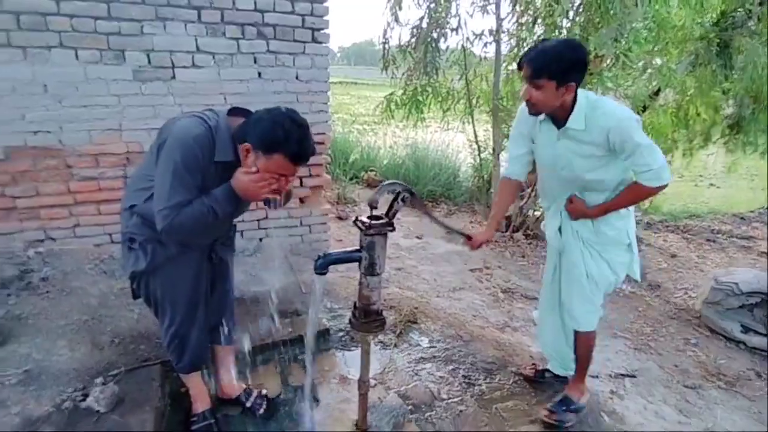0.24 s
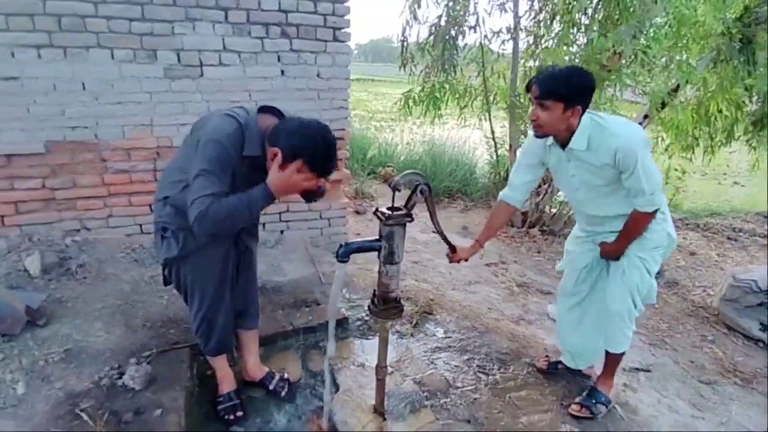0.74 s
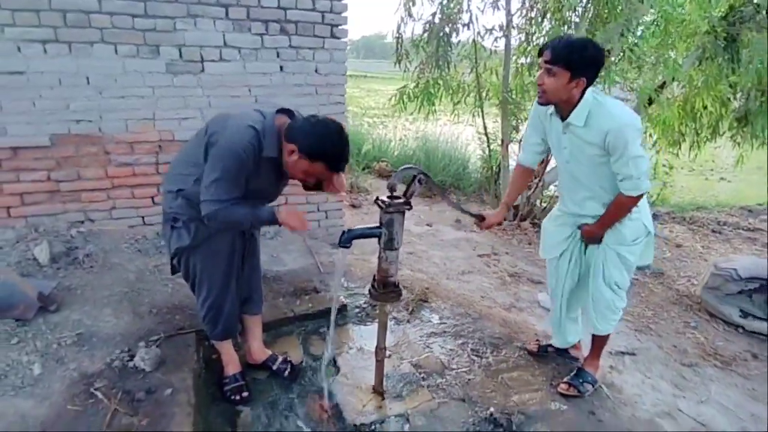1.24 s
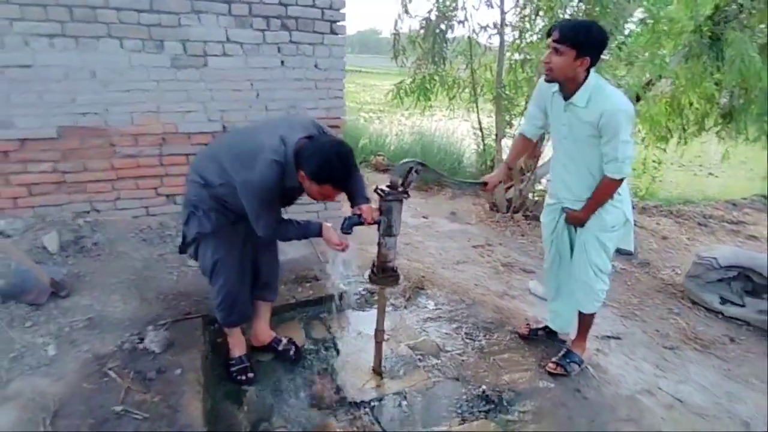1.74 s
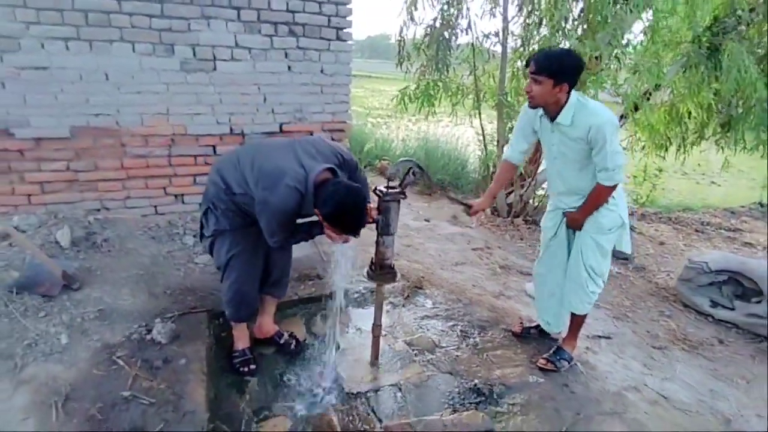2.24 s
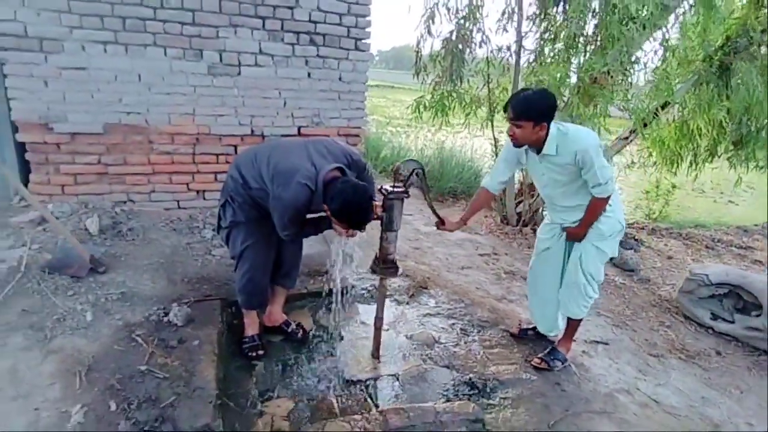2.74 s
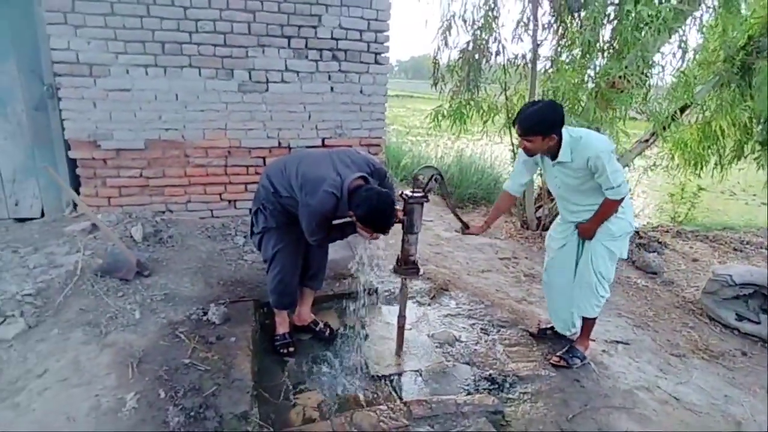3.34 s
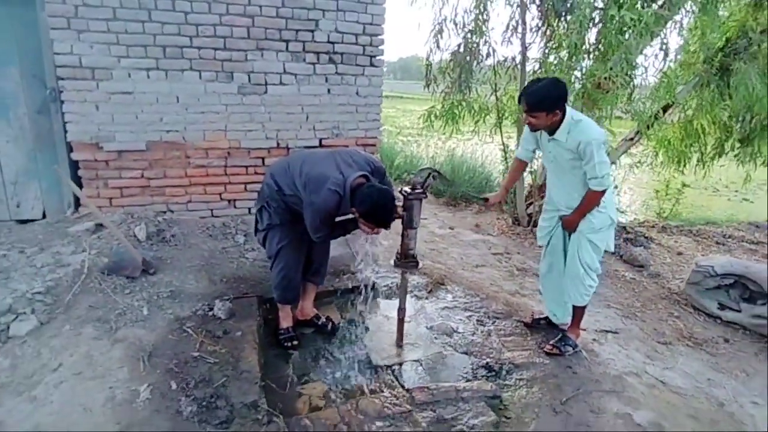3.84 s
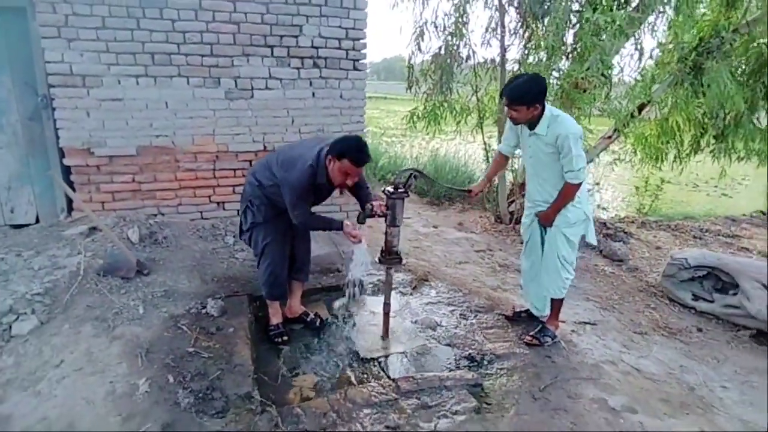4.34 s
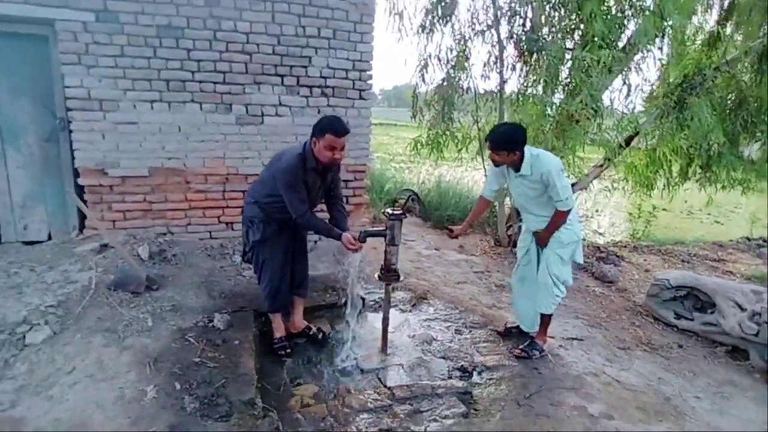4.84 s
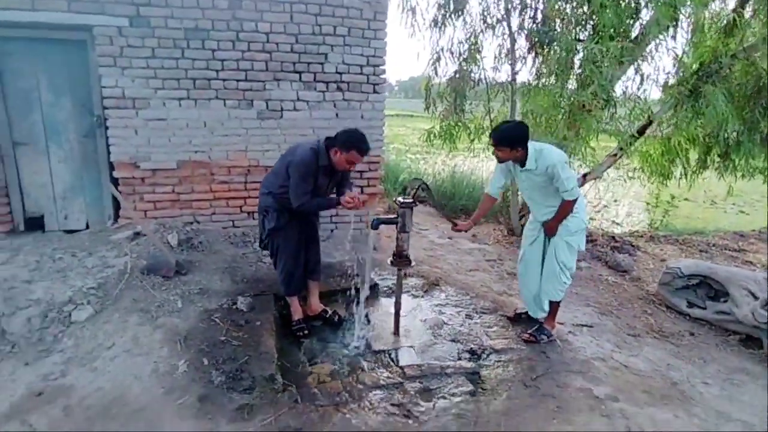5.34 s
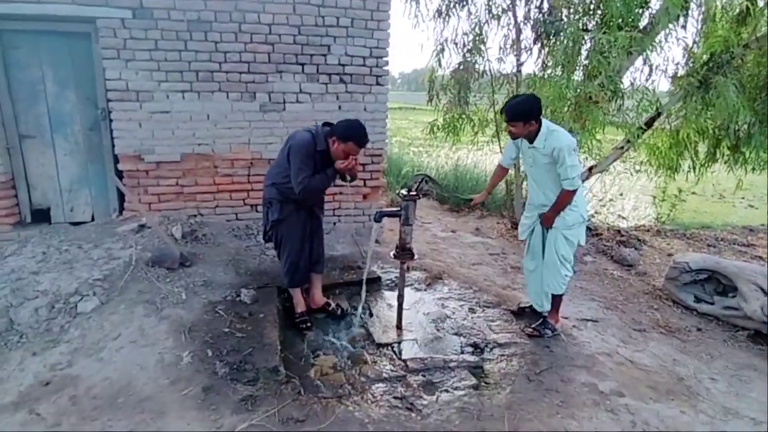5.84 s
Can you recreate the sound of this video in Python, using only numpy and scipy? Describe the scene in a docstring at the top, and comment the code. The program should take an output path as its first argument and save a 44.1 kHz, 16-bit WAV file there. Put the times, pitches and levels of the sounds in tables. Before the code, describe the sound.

Outdoors beside a brick wall, an old iron hand pump is worked steadily. Each downstroke thuds, cracks and rattles; each upstroke gives a sharp clank, with a hollow gulp inside. A dry squeak sounds early. Water splashes and sprays in uneven surges, drops slap the wet slab, wet hands rinse briefly near the start, and bubbles plop. The microphone is fairly close, brushed by low air puffs.

```python
"""Cast-iron hand pump in a brick-walled yard

About three strokes in two seconds: at each end noise bursts ring iron modes and a climbing tone gulps.
Clumped drops ring as splash, spray and puddle; fat drops slap as short pulses; rinsing is coloured noise.
The dry pivot squeaks as gliding tones, bubbles plop, and low noise puffs brush the microphone."""
import sys
import numpy as np
from scipy import signal
from scipy.fft import rfft, irfft, next_fast_len
from scipy.io import wavfile

SR = 44100
rng = np.random.default_rng(int(sys.argv[2]) if len(sys.argv) > 2 else 0)


def unload_audio(sound):
    """Save the sound as a 16-bit wav file, at the path given as the first command line argument."""
    columns = np.transpose(np.atleast_2d(sound))
    # keep every value between -1 and 1, then stretch to whole-number steps
    steps = np.round(np.clip(columns, -1, 1) * 32767)
    wavfile.write(sys.argv[1], SR, steps.astype(np.int16))


N = 269010
T = np.arange(N) / SR

# falling water: (time [s], splash level [dB], spray level [dB])
FLOW = [(0.0, -39.5, -49), (0.34, -39.5, -47), (0.52, -45.5, -47.5), (1.17, -49.5, -56), (1.46, -48.5, -53),
        (1.6, -43.5, -52), (2.04, -46.5, -47), (2.24, -38, -46), (2.41, -36, -40.5), (2.65, -46.5, -46),
        (2.84, -44.5, -49), (3.01, -41.5, -43.5), (3.48, -49.5, -49), (3.91, -44, -46), (4.03, -45, -47.5),
        (4.4, -43, -44), (4.74, -35.5, -39.5), (4.99, -39, -43.5), (5.21, -49.5, -51), (5.4, -35, -41),
        (5.57, -47.5, -52), (6.1, -48.5, -53)]
# handle hits bottom: (time [s], thud level [dB], crack level [dB], knock level [dB], chatter level [dB],
#   rattle delay [s], rattle length [s], rattle level [dB], extra sizzle [dB], puddle gush [dB],
#   handle ring level [dB], gulp pitch [Hz], gulp level [dB])
DOWNSTROKES = [(0.029, -22, -38, -29.5, -28, 0.11, 0.024, -23.5, -9, 12, -40, 405, -38),
               (0.707, -35, -44, -40, -29.5, 0.079, .012, -24, -9, 13.5, -41, 410, -48),
               (1.426, -22.5, -29, -31, -30.5, 0.086, 0.027, -28, 0.5, 19, -43, 403, -29),
               (2.123, -26, -20.5, -22, -22.5, 0.063, 0.023, -26, 3.5, 10, -38, 400, -33),
               (2.804, -34.5, -25, -40, -29.5, 0.071, 0.012, -22.5, 2.5, 10.5, -34.5, 400, -55),
               (3.448, -24, -29, -24.5, -26.5, 0.061, 0.019, -23, -1.5, 13, -34, 436, -25),
               (4.102, -31, -15.5, -30, -31, .052, 0.019, -28, 1, 7.5, -33, 420, -41),
               (4.763, -24.5, -25, -26, -23.5, 0.064, 0.023, -26, -0.5, 8.5, -50, 383, -27),
               (5.449, -27.5, -16, -26.5, -24, 0.075, 0.029, -28.5, -1.5, 8.5, -50, 380, -21)]
# handle hits top in one clank: (peak time [s], rise [s], fall [s], knock level [dB], clank level [dB],
#   sizzle level [dB], gulp pitch [Hz], gulp level [dB])
UPSTROKES = [(.414, .005, 0.015, -28, -20, -38, 440, -34.5),
             (1.12, 0.0063, 0.0075, -33.5, -18.5, -26, 422, -47),
             (1.836, 0.0059, 0.0092, -28.5, -20.5, -31.5, 365, -33.5),
             (2.511, 0.012, 0.0087, -35, -20, -32, 380, -34),
             (3.152, 0.008, 0.014, -30, -19, -24.5, 389.5, -34),
             (3.827, 0.0062, 0.017, -32.5, -18.5, -25, 417.4, -34),
             (4.475, 0.0049, 0.0076, -36.5, -20, -29, 358, -27),
             (5.181, 0.0027, 0.023, -36, -23.5, -31, 358, -44.5),
             (5.851, 0.014, 0.0058, -38, -24.5, -34, 368.4, -32)]


def from_db(db):
    """Decibels to gain."""
    return 10 ** (np.asarray(db) / 20)


def rms_one(x):
    """Scale to unit rms."""
    return x / np.sqrt(np.mean(x ** 2) + 1e-20)


def in_time(rows):
    """Interpolate each column of a curve at every sample."""
    time_s, *columns = np.transpose(rows)
    return [np.interp(T, time_s, column) for column in columns]


def coloured(x, spectrum):
    """Minimum-phase filter with the given spectrum, steep past its ends; rms 1."""
    hz, db = np.transpose(spectrum)
    size = next_fast_len(N + 8192)
    octave = np.log2(np.maximum(np.arange(size // 2 + 1) * SR / size, 1))
    below = np.maximum(np.log2(hz[0]) - octave, 0)
    above = np.maximum(octave - np.log2(hz[-1]), 0)
    skirt_db = np.minimum(40 * (below + above), 60)
    gain = from_db(np.interp(octave, np.log2(hz), db) - skirt_db)
    # fold the cepstrum to make the filter causal
    cepstrum = irfft(np.log(gain), size)
    cepstrum[1:size // 2] *= 2
    cepstrum[size // 2 + 1:] = 0
    response = np.exp(rfft(cepstrum))
    return rms_one(irfft(rfft(x, size) * response, size)[:N])


def drift(rate_hz):
    """Smooth random curve of rms 1: two-pole low-passed noise at SR / 40, interpolated."""
    r = np.exp(-80 * np.pi * rate_hz / SR)
    noise = rng.standard_normal(N // 40 + 2002)
    slow = signal.lfilter([1], [1, -2 * r, r * r], noise)[2000:]
    return np.interp(np.arange(N) / 40, np.arange(len(slow)), rms_one(slow))


def resonance(x, hz, width_hz):
    """Two-pole resonance, peak gain about 1."""
    r = np.exp(-np.pi * width_hz / SR)
    zeros = np.array([1, 0, -1]) * (1 - r * r) / 2
    poles = [1, -2 * r * np.cos(2 * np.pi * hz / SR), r * r]
    return signal.lfilter(zeros, poles, x + 1e-18)


def swell(t, rise_s, fall_s):
    """Rounded rise to 1 at t = 0, then exponential fall."""
    return np.exp(-np.minimum(np.where(t < 0, (t / rise_s) ** 2, t / fall_s), 40))


def impacts(per_s, spread_db):
    """Random clicks of uneven size and sign."""
    size_db = spread_db * np.minimum(rng.exponential(1, N), 4)
    sizes = from_db(size_db) * rng.choice([-1, 1], N)
    return sizes * (rng.random(N) < per_s / SR)


def around(s):
    """Slice of samples near a moment, and their time from it."""
    span = slice(max(int((s - .1) * SR), 0), int((s + .4) * SR))
    return span, T[span] - s


def chirp(s, hz, db, rise_s, fall_s, glide_hz_per_s):
    """One short, linearly gliding tone."""
    out = np.zeros(N)
    span, t = around(s)
    cycles = hz * t + glide_hz_per_s * t * t / 2 + rng.random()
    out[span] = from_db(db) * swell(t, rise_s, fall_s) * np.sin(2 * np.pi * cycles)
    return out


def yard(x, ground_s=.0045, ground_db=-14, wall_s=0.0055, wall_db=-20):
    """One echo from the ground and one from the brick wall."""
    echoes = [(ground_s, ground_db), (wall_s, wall_db)]
    return x + sum(from_db(db) * np.interp(T - lag_s, T, x, left=0) for lag_s, db in echoes)


def droplets(per_s, spread_db, clump_db, low_hz, high_hz, cycles, count=14):
    """Clumped drops, each ringing briefly at one of count pitches."""
    clicks = impacts(per_s, spread_db) * from_db(clump_db * drift(51))
    dealt = rng.integers(0, count, N)
    return sum(resonance(clicks * (dealt == k), hz, hz / cycles) / np.sqrt(hz) * (-1) ** k
               for k, hz in enumerate(np.geomspace(low_hz, high_hz, count)))


def lumps(per_s, fall_s, steady, spread_db):
    """Envelope of stream lumps that land at once and spatter away; rms 1."""
    landings = impacts(per_s, spread_db) ** 2
    power = signal.lfilter([1], [1, -np.exp(-1 / (fall_s * SR))], landings + 1e-18)
    return rms_one(np.sqrt(abs(steady) + power / power.mean()))


def water(spray_gain_db=0.5, surge_db=1.0):
    """Broken stream splashes, sprays and stirs puddle bubbles; landing gushes mostly swell the puddle."""
    # colours: (frequency [Hz], density [dB per Hz])
    splash_colour = [(1200, -10.5), (1700, 0), (2400, 6), (3000, 6), (3350, 0.5), (3900, 7), (4700, 2),
                     (5600, -10.5)]
    spray_colour = [(5300, -9.5), (6200, 0.5), (6800, -0.5), (8000, 6.5), (9000, -4.5), (10200, -6.5),
                    (11000, 1), (12300, -2.5), (13000, -7), (14600, 2.5), (15500, 6.5)]
    puddle_colour = [(300, -6), (450, -2.5), (700, 2), (1000, 6), (1400, 6)]
    gush_after_s, gush_rise_s, gush_fall_s = 0.15, 0.13, 0.048
    gush_splash_db, gush_spray_db = 0.5, 2
    spurt_after_s, spurt_rise_s, spurt_fall_s, spurt_peak_db = 0.092, 0.058, 0.023, 2
    base_db, follow = -60, 0.2  # puddle at mean splash between gushes; share of the splash's swing

    splash_db, spray_db = in_time(FLOW)
    gushes = [swell(T - s - gush_after_s, gush_rise_s, gush_fall_s) for s, *_ in DOWNSTROKES]
    gush = sum(gushes)
    # a smaller spurt follows each top of stroke
    spurts = sum(swell(T - s - spurt_after_s, spurt_rise_s, spurt_fall_s) for s, *_ in UPSTROKES)
    stir_db = sum(db * one for (*_, db, _, _, _), one in zip(DOWNSTROKES, gushes))
    puddle_db = base_db + follow * (splash_db - splash_db.mean()) + stir_db

    splash = coloured(droplets(per_s=3200, spread_db=3.5, clump_db=1.7,
                               low_hz=1302, high_hz=5500, cycles=12.8), splash_colour)
    spray = coloured(droplets(per_s=5500, spread_db=2.5, clump_db=0.5,
                              low_hz=5060, high_hz=15800, cycles=18.0), spray_colour)
    puddle = coloured(droplets(per_s=800, spread_db=1.0, clump_db=2.0,
                               low_hz=380, high_hz=1523, cycles=20.0), puddle_colour)
    splash = splash * lumps(per_s=110, fall_s=0.0077, steady=0.44, spread_db=3.0)
    spray = spray * lumps(per_s=80, fall_s=0.002, steady=0.83, spread_db=0.5)

    stream = from_db(splash_db + gush_splash_db * gush) * splash
    stream += from_db(spray_db + spray_gain_db + gush_spray_db * gush) * spray
    stream += from_db(puddle_db) * puddle
    return stream * from_db(spurt_peak_db * spurts + surge_db * drift(41))


def air(breeze_db=-73, breeze_swing_db=4, field_db=-63):
    """Low noise puffs that swing a few cycles, pump shudder at stroke ends, faint hush of open fields."""
    # puffs on the microphone: (peak time [s], level [dB], length [s])
    puffs = [(.135, -40.5, 0.026), (.57, -40.5, 0.028), (.8, -50.5, 0.05), (1.155, -43, 0.023),
             (1.26, -47, 0.06), (1.6, -38, .012), (1.65, -39, 0.017), (3.21, -43, 0.02), (4.19, -36, 0.023),
             (5.585, -35, 0.021), (5.705, -34, .025), (5.785, -40, 0.02), (5.978, -42, 0.023)]
    # colours: (frequency [Hz], density [dB per Hz])
    puff_colour = [(35, -27), (60, -7), (85, 0), (115, 1.5), (170, -5), (260, -13.5)]
    field_colour = [(55, -8), (100, -8.5), (300, -11), (700, -13), (2000, -19), (6000, -18.5),
                    (15000, -14.5)]
    swing_hz, swing_db, noise_db = 107, 0.5, -1.5  # swing centre; trims on the puff level
    shudder_after_s, shudder_rise_s, shudder_fall_s, shudder_db = 0.0075, 0.0089, 0.034, -46.5

    gusts = sum(from_db(db + noise_db) * swell(T - s, length_s, length_s) for s, db, length_s in puffs)
    swings = sum(chirp(s, swing_hz * 2 ** (0.26 * luck), db + swing_db, length_s, length_s, 0)
                 for (s, db, length_s), luck in zip(puffs, rng.uniform(-1.07, 1, len(puffs))))
    shudders = sum(swell(T - s - shudder_after_s, shudder_rise_s, shudder_fall_s)
                   for s, *_ in list(DOWNSTROKES) + list(UPSTROKES))
    breeze = from_db(breeze_db + breeze_swing_db * drift(2))
    level = gusts + from_db(shudder_db) * shudders + breeze
    low_air = level * coloured(rng.standard_normal(N), puff_colour)
    fields = from_db(field_db) * coloured(rng.standard_normal(N), field_colour)
    return swings + low_air + fields


def jolts(thud_hz=245, thud_rise_s=0.0021, thud_fall_s=0.0047, thud_delay_s=0.0044, crack_fall_s=0.0024):
    """Linkage slack taken up with a hard noise crack, then a dull tonal thud as the piston takes the load."""
    # crack colour: (frequency [Hz], density [dB per Hz])
    crack_colour = [(500, -11), (1300, -12), (1900, 5.5), (2800, 6), (3700, -30), (6000, -29)]
    thuds, cracks = np.zeros(N), np.zeros(N)
    pitches = rng.uniform(.88, 1.12, len(DOWNSTROKES))
    for (s, thud_db, crack_db, *_), pitch in zip(DOWNSTROKES, pitches):
        span, t = around(s)
        thuds += chirp(s + thud_delay_s, thud_hz * pitch, thud_db, thud_rise_s, thud_fall_s, 0)
        cracks[span] += from_db(crack_db) * swell(t - .001, .0006, crack_fall_s)
    return thuds + cracks * coloured(rng.standard_normal(N), crack_colour)


def bursts():
    """Yield chatter bursts: (peak time [s], handle 0 down / 1 up, rise [s], fall [s], register levels [dB])."""
    # loose linkage shakes between clanks, and a hand slaps at 0.448 s: (peak time [s], level [dB])
    shakes = [(.396, -23.5), (.448, -38), (0.829, -38), (0.897, -41.5), (1.051, -37.5), (1.14, -36.5),
              (1.18, -35.5), (1.741, -33.5), (4.534, -33.5), (5.869, -30)]
    # colours [dB] in the registers knock, clank, zing, sizzle
    knock = (-0.5, 1.5, -7, -19)
    chatter = (-11, 0, -1.5, -11.5)
    rattle = (-19.5, -0.5, -1, -9.5)
    knock_after_s, knock_rise_s, knock_fall_s = 0.0031, 0.0041, .012
    chatter_after_s, chatter_rise_s, chatter_fall_s = 0.017, 0.0054, 0.012
    gap, rise, fall = 1.18, 0.48, 0.64  # shares of the rattle length
    shake_rise_s, shake_fall_s = 0.0054, 0.02
    up_zing_db = -3  # re clank

    for s, _, _, knock_db, chatter_db, after_s, length_s, rattle_db, sizzle_db, *_ in DOWNSTROKES:
        bright = np.array([0, 0, 0, sizzle_db])
        yield s + knock_after_s, 0, knock_rise_s, knock_fall_s, knock_db + bright + knock
        yield s + chatter_after_s, 0, chatter_rise_s, chatter_fall_s, chatter_db + bright + chatter
        for bounce in (-.5, .5):  # the rattle bounces twice
            peak_s = s + after_s + bounce * gap * length_s
            yield peak_s, 0, rise * length_s, fall * length_s, rattle_db + bright + rattle
    for s, rise_s, fall_s, knock_db, clank_db, sizzle_db, *_ in UPSTROKES:
        yield s, 1, rise_s, fall_s, (knock_db, clank_db, clank_db + up_zing_db, sizzle_db)
    for s, db in shakes:
        yield s, 1, shake_rise_s, shake_fall_s, db + np.array(chatter)


def clatter(contact_db=10.5):
    """Loose iron chatters in bursts of tiny blows, each burst exciting the body modes differently."""
    # pump modes: (frequency [Hz], width [Hz], handle-down level [dB], handle-up level [dB])
    iron = [(392, 50, 31, 26.5), (437, 6.7, 31, -10), (542, 24.5, 25.5, 29.5), (591, 19, 31, 34.5),
            (988, 47, 19, 11), (1393, 15, 21, 14), (1723, 31.5, 26.5, 22), (1900, 39, 28.5, 25),
            (2105, 63, 32, 25.5), (2338, 210, 12, 18.5), (2850, 460, 16, 10.5), (3620, 57, 30, 24),
            (4200, 135, 11, 37), (4470, 66, 39, 14), (4370, 44, 44, 8), (4564, 140, -9, 28.5),
            (4860, 6.7, 14, -24), (6450, 170, 16, 19.5), (7720, 204, 33, 28.5), (8156, 67, 37.5, 33.5),
            (8900, 450, -5, 22.5), (10040, 200, 8, 20.5), (10350, 220, -10, 25), (11020, 250, 20.5, 29),
            (11900, 94, 28.5, 1), (13100, 700, 6, 20), (14300, 300, 18, 8)]
    # edges of the registers knock, clank, zing, sizzle: (frequency [Hz])
    edges_hz = [300, 900, 3200, 6000, 15800]
    click = np.r_[1., np.zeros(SR // 8)]
    modes = np.array([click] + [resonance(click, hz, width_hz) for hz, width_hz, _, _ in iron])
    registers = []
    for low_hz, high_hz in zip(edges_hz, edges_hz[1:]):
        band = signal.butter(3, [low_hz, high_hz], "band", fs=SR, output="sos")
        registers.append(signal.sosfilt(band, modes))
    blows = rms_one(impacts(per_s=7700, spread_db=3.0))
    out = np.zeros(N)
    for s, handle, rise_s, fall_s, levels_db in bursts():
        luck_db = rng.uniform(-5, 5, len(iron))
        strengths = from_db(np.r_[contact_db, np.array(iron)[:, 2 + handle] + luck_db])
        rings = [strengths @ register for register in registers]
        body = sum(from_db(db) * ring / np.linalg.norm(ring) for db, ring in zip(levels_db, rings))
        span, t = around(s)
        out[span] += signal.fftconvolve(blows[span] * swell(t, rise_s, fall_s), body)[:len(t)]
    return out


def gulps(settle_s=0.111, tail_rough=0.47):
    """Reversals ring the water column: the note climbs and settles as water rises; its soft tail wavers."""
    after_s, rise_s, fall_s = .013, 0.0075, 0.017
    tail_db, tail_s, glide_hz_per_s = -16.5, 0.077, 300
    out = np.zeros(N)
    waver = 1 + tail_rough * drift(26)
    for s, *_, hz, db in list(DOWNSTROKES) + list(UPSTROKES):
        span, t = around(s + after_s)
        pitch_hz = hz + glide_hz_per_s * settle_s * np.tanh(t / settle_s)
        tail = from_db(tail_db) * swell(t, rise_s, tail_s) * waver[span]
        level = swell(t, rise_s, fall_s) + tail
        out[span] += from_db(db) * level * np.sin(2 * np.pi * (np.cumsum(pitch_hz) / SR + rng.random()))
    return out


def handle_ring(delay_s=0.066, rise_s=0.032, fall_s=0.013):
    """Steel handle modes build up after each jolt, unevenly each time, then ring out."""
    # free handle modes: (frequency [Hz], relative level [dB])
    handle_modes = [(2120, -3), (3582, -5), (4326, 0), (4430, -2), (5264, -8), (6415, -9), (8088, -6),
                    (10200, -16)]
    out = np.zeros(N)
    for s, *_, db, _, _ in DOWNSTROKES:
        draws = rng.uniform(-0.89, 1, (len(handle_modes), 2))
        for (hz, mode_db), (strength, lag) in zip(handle_modes, draws):
            out += chirp(s + delay_s + .025 * lag, hz, db + mode_db + 3 * strength, rise_s, fall_s, 0)
    return out * (1 + .25 * drift(150))


def wash(flutter_db=1.0):
    """Wet hands sweep a face and fling water off: a fine, fairly even rush of coloured noise."""
    # sweep: (time [s], level [dB])
    sweep = [(.1, -80), (.2, -43), (.29, -34.5), (.34, -41), (.39, -34.5), (.46, -38.5), (.5, -40.5),
             (.62, -50), (.68, -105)]
    # colour: (frequency [Hz], density [dB per Hz])
    rinse_colour = [(270, -12.5), (430, -5), (600, -2.5), (800, -6), (1300, 3), (2600, 1.5), (4000, -6),
                    (5500, -16), (8000, -23), (14000, -17)]
    level_db, = in_time(sweep)
    return from_db(level_db + flutter_db * drift(41.4)) * coloured(rng.standard_normal(N), rinse_colour)


def spills(count=26):
    """Lesser drops off cupped hands at uneven gaps, harder in strong flow: (time [s], level [dB], pitch [Hz])."""
    from_s, to_s = 1.7, 5.9
    base_db, spread_db, follow = -26, 3, 0.78  # follow: share of the splash's swing
    centre_hz, spread_octaves = 2800, 0.42
    when, size, pitch = rng.uniform(-0.92, 1, (count, 3)).T
    s = np.linspace(from_s, to_s, count) + when * (to_s - from_s) / count
    flow_db = np.interp(s, T, in_time(FLOW)[0])
    db = base_db + spread_db * size + follow * (flow_db - flow_db.mean())
    return list(zip(s, db, centre_hz * 2 ** (spread_octaves * pitch)))


def slaps(rise_s=0.0005, fall_s=0.00066, slap_db=-2.5, bounce_s=.0019, bounce_db=-4.0,
          scatter_db=-12, scatter_fall_s=0.0023, count=2):
    """Drops land as pulses of a few cycles, rebound count times, and scatter a noise patter."""
    # fattest drops on the wet slab: (time [s], relative level [dB], pitch [Hz])
    fat_drops = [(.3565, -13, 3140), (.449, -22, 4550), (.4754, -20, 3720), (.5333, -22.5, 3950),
                 (1.5917, -22.5, 1960), (1.6886, -17, 2380), (1.6983, -13, 2430), (2.0, -19, 2900),
                 (2.0193, -19, 2510), (2.058, -21.5, 2700), (2.3718, -14.5, 2800), (2.404, -10.5, 2670),
                 (2.4205, -15.5, 2480), (2.6246, -22, 2400), (2.7409, -19, 2600), (2.7579, -24, 3110),
                 (2.9262, -19.5, 3200), (3.033, -23.5, 7500), (3.0698, -12.5, 3200), (3.1164, -15.5, 2050),
                 (3.2507, -21, 2550), (3.2819, -17, 2540), (3.4314, -21.5, 2680), (3.683, -24, 3250),
                 (3.8997, -13.5, 2290), (4.039, -20, 2370), (4.0718, -19.5, 2470), (4.2317, -20, 2700),
                 (4.2507, -16.5, 2880), (4.2787, -23.5, 4370), (4.309, -23, 2700), (4.3547, -22, 2840),
                 (4.4507, -16.5, 2670), (4.4595, -14.5, 3850), (4.52, -15, 2580), (4.5562, -20, 2950),
                 (4.6328, -20, 2930), (4.7036, -18.5, 2920), (4.7789, -15.5, 2280), (4.9198, -18, 2020),
                 (5.2224, -16, 2460), (5.243, -17, 2540), (5.3055, -14, 2780), (5.361, -19, 2530),
                 (5.404, -17.5, 2560), (5.7128, -16.5, 2150), (5.913, -20.5, 4630)]
    # patter colour: (frequency [Hz], density [dB per Hz])
    patter_colour = [(1100, -7.5), (2000, 4), (3600, 4.5), (5500, -7), (8000, -9), (15000, -25)]
    out, scatter = np.zeros(N), np.zeros(N)
    drops = list(fat_drops) + spills()
    draws = rng.uniform(-0.96, 1, (len(drops), count + 1, 4))
    for (s, db, hz), luck in zip(drops, draws):
        span, t = around(s + rise_s / 2)
        for k, (size, lag, pitch, phase) in enumerate(luck):
            since = t - k * bounce_s * from_db(3 * lag)
            bounce_hz = hz * from_db(1.5 * k * pitch)
            tone = np.sin(2 * np.pi * bounce_hz * since + np.pi * phase)
            pulse = swell(since, rise_s, fall_s * from_db(4 * size)) * tone
            out[span] += from_db(db + slap_db + k * bounce_db) * pulse
        scatter[span] += from_db(db + scatter_db) * swell(t, rise_s, scatter_fall_s)
    return out + scatter * coloured(rng.standard_normal(N), patter_colour)


def squeaks(rough=0.29, sag_hz_per_s=290, slip_rise_s=0.0019, slip_fall_s=0.0083, width_hz=340, count=5):
    """Dry pivot sings in brief, uneven, sagging tones, and once judders in a run of resonant noise slips."""
    # sung notes: (peak time [s], pitch [Hz], level [dB], rise [s], fall [s])
    notes = [(.416, 1680, -11, 0.0058, 0.012), (0.563, 7650, -35.5, 0.027, 0.015),
             (2.595, 1760, -40, 0.038, .025), (5.285, 1943, -32.5, 0.028, 0.047),
             (5.345, 1875, -38, .013, .033), (5.85, 2093, -22, 0.0023, 0.011)]
    judder_s, judder_gap_s, judder_hz, judder_db = 5.806, .0193, 1460, -34.5
    sung = sum(chirp(*row, -sag_hz_per_s) for row in notes) * (1 + rough * drift(110))
    slips = sum(swell(T - judder_s - k * judder_gap_s, slip_rise_s, slip_fall_s) for k in range(count))
    rasp = resonance(rng.standard_normal(N), judder_hz, width_hz)
    rasp = resonance(rasp, judder_hz, width_hz)
    return sung + from_db(judder_db) * slips * rms_one(rasp)


def plops(rise_s=0.0055, fall_s=0.013, climb_per_s=2.5):
    """Large bubbles in puddle and hands: each note climbs as the bubble reaches the surface."""
    # bubbles: (peak time [s], pitch [Hz], peak level [dB])
    bubbles = [(.44, 520, -34), (.463, 307, -34.5), (.556, 575, -44), (.6, 1090, -40.5), (.675, 1450, -44),
               (.895, 810, -39), (.9, 435, -38), (1.197, 551, -36), (1.542, 548, -32.5), (1.612, 803, -37),
               (1.617, 425, -30.5), (2.215, 1334, -37), (2.268, 450, -33.5), (2.345, 1680, -40),
               (4.239, 1470, -39), (4.275, 805, -41), (4.573, 1900, -37), (4.929, 403, -39.5),
               (5.626, 980, -42.5)]
    return sum(chirp(s, hz, db, rise_s, fall_s, climb_per_s * hz) for s, hz, db in bubbles)


def scene():
    """Mix pump, water and air; iron blows, slaps and stream get the yard echoes."""
    pump = yard(clatter() + jolts()) + handle_ring() + gulps() + squeaks()
    wet = yard(slaps() + water()) + wash() + plops()
    return (pump + wet + air())[None]


def record(dry, cutoff_hz=15550):
    """Steep elliptic low-pass."""
    low_pass = signal.ellip(10, .1, 80, cutoff_hz, fs=SR, output="sos")
    return signal.sosfilt(low_pass, dry)


dry = scene()
out = record(dry)
unload_audio(out)
```